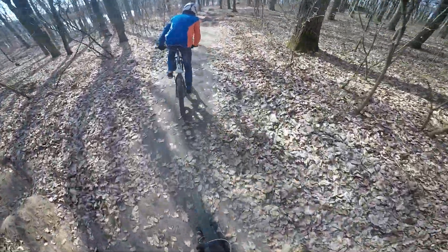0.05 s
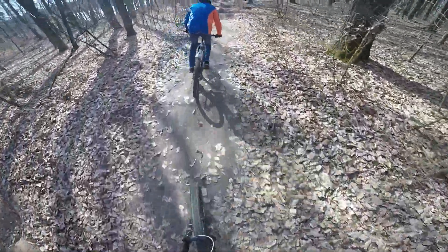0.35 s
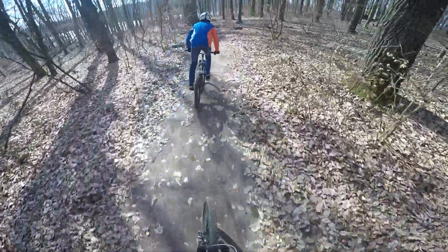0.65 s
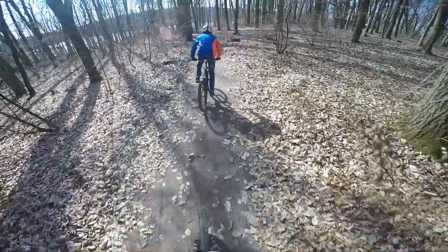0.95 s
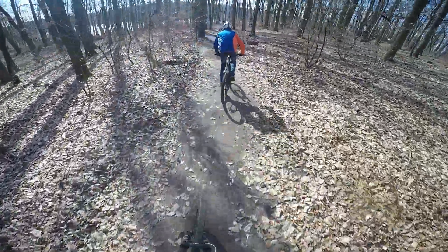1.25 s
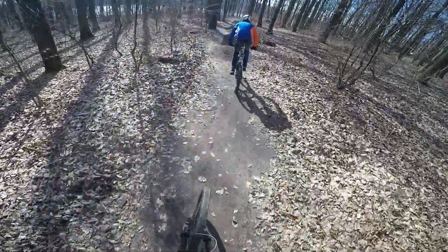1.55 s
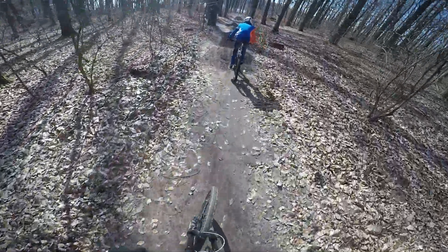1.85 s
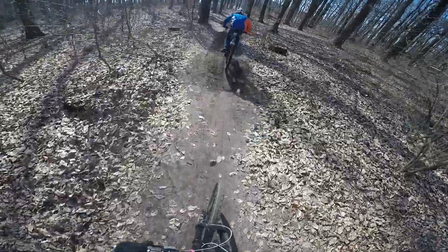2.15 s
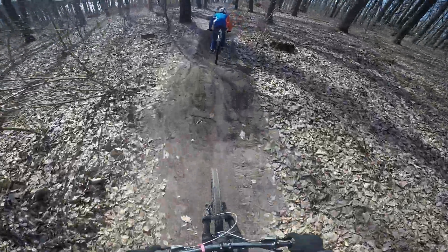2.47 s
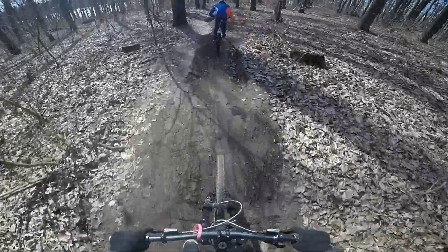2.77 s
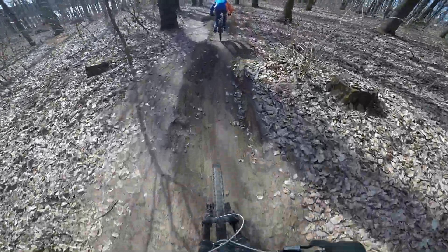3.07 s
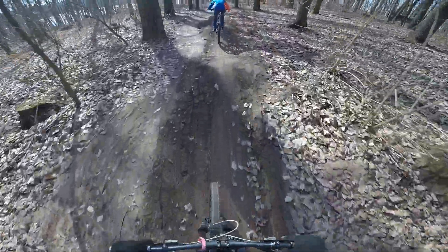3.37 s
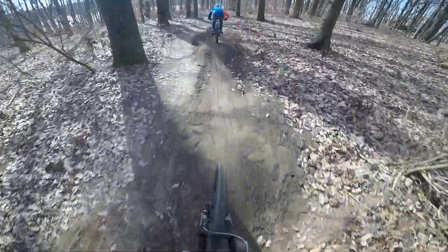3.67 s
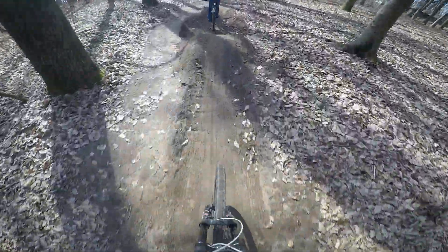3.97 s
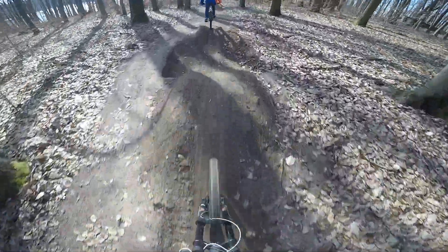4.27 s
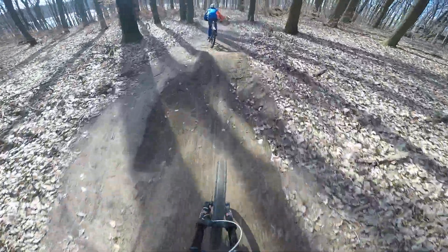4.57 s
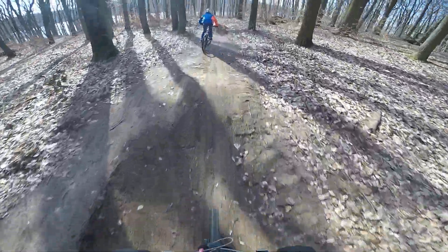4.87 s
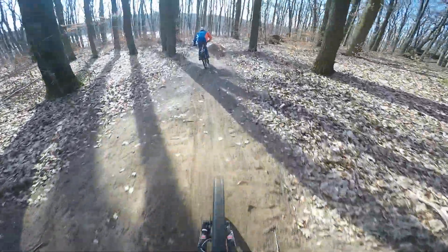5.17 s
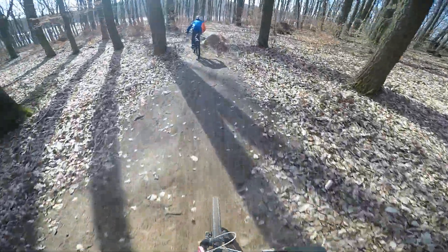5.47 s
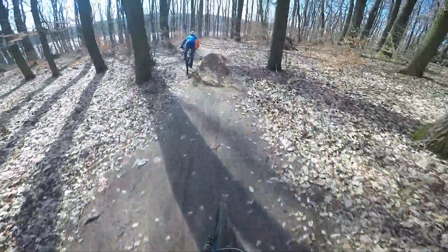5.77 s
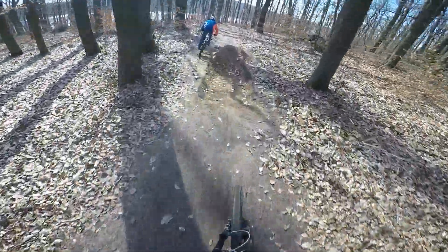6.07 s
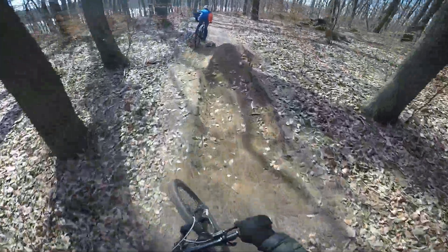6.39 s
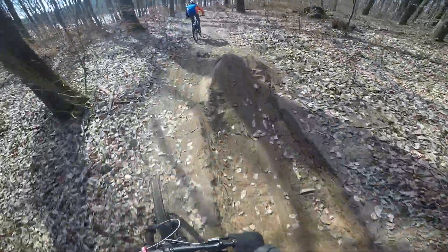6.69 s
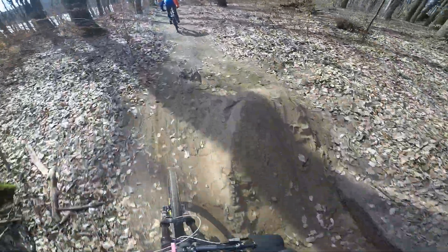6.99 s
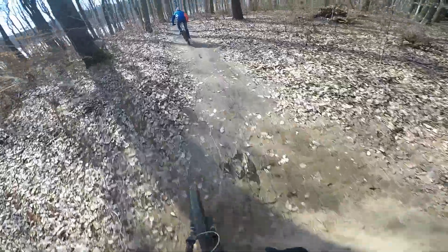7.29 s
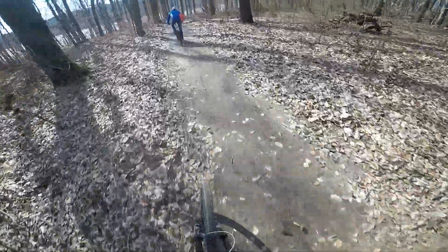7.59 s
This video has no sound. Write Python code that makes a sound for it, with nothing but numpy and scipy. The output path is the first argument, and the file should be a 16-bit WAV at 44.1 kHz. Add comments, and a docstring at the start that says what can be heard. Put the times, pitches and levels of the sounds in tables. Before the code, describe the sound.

A mountain bike coasts down a leafy dirt trail, heard close from a cased camera on the rider, with a slightly hollow, boxy tone. From the start, tyres crunch over soil and crackle through dry leaves, while the bike and camera mount give irregular sharp clacks, knocks and short scuffs, with occasional tiny twig snaps. Low wind buffets the microphone in gusts. From about 1.6 seconds the freewheel ticks in faint, thin, sizzling spurts, pausing around 5.6 and returning near 7.3. Stronger gusts arrive around 2.9, 4.3 and 5.2 seconds. Between 3.5 and 5.5 seconds, jolts make several deep, muffled thumps, the biggest at about 4.3, amid busier clattering. Firm knocks follow around 6 seconds, then the leaves crackle more and the rush of air swells as the bike gathers speed. The two hardest clacks land at about 7.5 and 7.6 seconds.

```python
"""A mountain bike coasts down a leafy dirt trail, heard from a cased camera worn by the rider.
From the start, tyres crunch over soil and dry leaves, and bike and mount clack and scuff on bumps.
After about 1.6 s the freewheel ticks in spurts. From 3.5 to 5.5 s, jolts thump the air in the case.
The rush of air grows as the bike gathers speed, and the two hardest clacks come just before the end.
The case rings at its own pitches, which colours most of these sounds."""
import sys
import numpy as np
from scipy import signal
from scipy.fft import rfft, irfft, next_fast_len
from scipy.io import wavfile
from scipy.ndimage import uniform_filter1d

SR = 44100
rng = np.random.default_rng(int(sys.argv[2]) if len(sys.argv) > 2 else 0)


def log_audio(samples):
    """Write samples as a 16-bit WAV file to the path given in sys.argv[1]."""
    # one column per channel
    frames = np.atleast_2d(samples).T
    # limit to full scale, then quantise
    limited = np.clip(frames, -1, 1)
    pcm = np.round(limited * 32767).astype(np.int16)
    wavfile.write(sys.argv[1], SR, pcm)


N = 336924
TIME = np.arange(N) / SR

# air stream, growing with speed: t/s, drone level/dB, rush level/dB
AIR_STREAM = [(0, -69.5, -68), (1.6, -58, -65), (2.2, -60.5, -66), (3.2, -58, -63.5), (4.1, -59, -63.5),
              (4.95, -53.5, -61), (5.5, -55, -63), (6.35, -54, -63), (6.6, -51.5, -56.5),
              (6.92, -51, -56.5), (7.2, -55.5, -58.5), (7.64, -52.5, -55.5)]
# puffs of pressure on bumps: t/s, peak level/dB, quickness/Hz, direction (+1 into the case, -1 out)
JOLTS = [(3.468, -20, 57, -1), (4.309, -13.5, 51.7, -1), (4.611, -19.5, 46.5, 1), (5.035, -25.5, 54.5, 1),
         (5.362, -20, 53, 1), (5.448, -28.5, 49, 1)]


def from_db(db):
    """Turn decibels into a number to multiply by."""
    return 10 ** (np.asarray(db) / 20)


def unit_power(x):
    """Scale a sound so that its average power is 1."""
    return x / np.sqrt(np.mean(x ** 2) + 1e-20)


def curves(rows):
    """Join timed points with straight lines, one curve for each column after the time."""
    times, *columns = np.transpose(rows)
    return [np.interp(TIME, times, column) for column in columns]


def add(out, s, sound):
    """Mix a short sound in at s seconds."""
    start = int(np.clip(s * SR, 0, N - 1))
    out[start:start + len(sound)] += sound[:N - start]


def drift(rate):
    """A smooth random wobble about 1 in size; a higher rate wobbles faster."""
    step, warm_up = 40, 2000
    pole = np.exp(-2 * np.pi * step * rate / SR)
    noise = rng.standard_normal(N // step + warm_up + 2)
    slow = signal.lfilter([1], [1, -2 * pole, pole * pole], noise)[warm_up:]
    return np.interp(np.arange(N) / step, np.arange(len(slow)), unit_power(slow))


def swell(s, length):
    """A smooth rise to 1 and fall, centred on s seconds."""
    out = np.zeros(N)
    start, end = np.searchsorted(TIME, [s - length / 2, s + length / 2])
    out[start:end] = np.cos(np.pi * (TIME[start:end] - s) / length) ** 2
    return out


def swells_db(rows):
    """Add a table of swells into one curve in dB."""
    return sum(db * swell(s, length) for s, length, db in rows)


def ring(x, hz, width_hz):
    """Make a sound ring at one pitch; a narrower width rings longer."""
    b, a = signal.iirpeak(hz, hz / width_hz, fs=SR)
    return signal.lfilter(b, a, signal.lfilter(b, a, x + 1e-18))


def through_case(x, colour):
    """Shape a sound by a colour (its level at each pitch) and the ringing case; the power comes out as 1."""
    # pitches the camera case boosts or weakens: f/Hz, width/Hz, gain/dB
    resonances = [(106, 56, 0.5), (227.4, 48, 7), (528, 16, 2.5), (678, 57, 4), (801, 19, 6.5),
                  (1130, 122, 7), (1342, 274, 9), (1830, 103, 5), (2027, 85, 6.5), (2080, 280, -0.5),
                  (2277, 104, 5.5), (2620, 44, -0.5), (2610, 230, 4.5), (3065, 280, -2), (3480, 156, 5),
                  (3900, 560, 5), (4400, 500, -3), (6650, 92, 1.5), (7870, 1340, 3)]
    size = 2 * next_fast_len(len(x) // 2 + 1)
    hz = np.maximum(np.arange(size // 2 + 1) * SR / size, 1)
    colour_hz, colour_db = np.transpose(colour)
    db = np.interp(np.log(hz), np.log(colour_hz), colour_db)
    db += sum(gain / (1 + (2 * (hz - centre) / width) ** 2) for centre, width, gain in resonances)
    # a minimum-phase filter: the case rings only after it is struck
    cepstrum = irfft(db * np.log(10) / 20)[:size // 2]
    response = np.exp(rfft(2 * cepstrum, size) - cepstrum[0])
    return unit_power(irfft(rfft(x, size) * response)[:len(x)])


def hiss():
    """A faint, steady hiss behind everything."""
    # colour of the hiss: f/Hz, level/dB
    colour = [(200, 8.9), (2000, 0.87), (6000, 5.7), (10000, 0.79), (15000, 0.46)]
    return from_db(-64) * through_case(rng.standard_normal(N), colour)


def buffeting():
    """How hard the air shakes the case: gusts on top of a wavering calm."""
    # gusts, strongest in dips of the trail: middle t/s, length/s, level/dB
    gusts = [(0.303, 0.52, -40), (0.627, 0.21, -34), (0.883, 0.12, -40), (1.228, 0.12, -40.5),
             (1.436, 0.065, -36), (1.746, 0.12, -38), (1.92, 0.24, -45.5), (2.56, 0.19, -53),
             (2.85, 0.24, -25), (3.003, 0.099, -29.5), (3.515, 0.18, -29), (3.647, 0.17, -29.5),
             (3.87, 0.36, -45), (4.308, 0.16, -22.5), (4.428, 0.14, -24.5), (5.07, 0.054, -31),
             (5.167, 0.075, -23.5), (5.248, 0.086, -29), (5.32, 0.07, -28.5), (5.805, 0.23, -29.5),
             (6.23, 0.13, -47), (6.915, 0.24, -32), (7.24, 0.5, -43), (7.54, 0.23, -34.5)]
    # lulls in the calm: middle t/s, length/s, gain/dB
    lulls = [(0.49, 0.1, -19), (1.3, 0.23, -15)]
    calm = from_db(-45 + 3 * drift(20) + swells_db(lulls))
    return calm + sum(from_db(db) * swell(s, length) for s, length, db in gusts)


def wind():
    """Swirls rock the air in the case; the stream drones and rushes past its edges, puffing at each jolt."""
    # colours of the deep swirls, the low drone and the higher rush: f/Hz, level/dB
    swirl_colour = [(8, -18.5), (16, 3), (24, 1), (34, -4.5), (50, -31.5), (80, -36.5), (150, -47),
                    (400, -66), (4000, -105)]
    drone_colour = [(40, -21.5), (80, 2.5), (130, 6), (180, -9), (280, -7.5), (400, -18), (900, -61)]
    rush_colour = [(150, -23.5), (330, -5.5), (480, 1), (680, -1.5), (880, 2), (1150, -5), (1500, -17),
                   (3000, -40)]
    drone_db, rush_db = curves(AIR_STREAM)
    swirls = signal.hilbert(through_case(rng.standard_normal(N), swirl_colour))
    # even them out: the swirls of one gust are much alike in strength
    swirl_power = uniform_filter1d(np.abs(swirls) ** 2, size=2000)
    swirls = unit_power(swirls.real / np.sqrt(swirl_power + 0.018))
    drone = from_db(drone_db - 0.04 + 1.57 * drift(21)) * through_case(rng.standard_normal(N), drone_colour)
    puffs = sum(from_db(db - 41) * swell(s, length=0.054) for s, db, _, _ in JOLTS)
    rush_gain = from_db(rush_db - 0.97 + 1.55 * drift(12.5)) + puffs
    rush = rush_gain * through_case(rng.standard_normal(N), rush_colour)
    return buffeting() * swirls + drone + rush


def thumps():
    """Each jolt rocks the air in the case once: a quick lead-in, the main swing, a slower settling."""
    out = np.zeros(N)
    for s, db, hz, direction in JOLTS:
        cycles = (TIME - s) * hz
        before_peak = cycles < 0
        spread = np.where(before_peak, 0.477, 0.77)
        turns = cycles * np.where(before_peak, 1.24, 0.575)
        out += direction * from_db(db) * np.cos(2 * np.pi * turns) * np.exp(-(cycles / spread) ** 2)
    return out


def freewheel():
    """Small catches (pawls) click and scrape over steel teeth in a thin sizzle; the hub whirrs along."""
    # spurts of ticking: start t/s, length/s, level/dB, pawl f/Hz, width/Hz (wider when they rattle)
    spurts = [(1.646, 0.33, -72.5, 14000, 750), (2.06, 0.2, -76, 14000, 900), (2.22, .06, -67, 13900, 1300),
              (2.28, 0.07, -64, 13850, 1700), (2.34, 0.13, -72, 13750, 1400),
              (2.553, 0.26, -71, 13950, 1100), (2.896, 2.03, -77, 13900, 700), (3.5, .24, -76, 13700, 1400),
              (4.27, .13, -71, 13900, 1100), (5.0, 0.6, -78, 14000, 900), (7.266, 0.45, -76.5, 14000, 800)]
    ticks_per_s, scrape_share, fade_s = 78, 0.21, 0.036
    rate = ticks_per_s * np.exp(0.13 * drift(1.6)) * from_db(0.84 * drift(11))
    tooth = np.cumsum(rate) / SR % 1  # runs from 0 to 1 across each tooth
    clicks = unit_power((np.diff(tooth, prepend=0) < 0) * from_db(3.4 * drift(30)))
    scrape = unit_power(np.exp(-tooth / scrape_share) * rng.standard_normal(N))
    force = clicks + scrape
    sizzle, running = np.zeros(N), np.zeros(N)
    for s, length, db, hz, width_hz in spurts:
        spurt = np.clip(np.minimum(TIME - s, s + length - TIME) / fade_s + 0.5, 0, 1)
        sizzle += from_db(db) * spurt * unit_power(ring(force * rng.choice([-1, 1], N), hz, width_hz))
        running = np.maximum(running, spurt)
    lower_ring = from_db(-78) * unit_power(ring(force * from_db(2 * drift(40)), hz=10070, width_hz=920))
    whirr = from_db(-66) * unit_power(ring(scrape, hz=2040, width_hz=180))
    return sizzle + running * (lower_ring + whirr)


def small_noises():
    """Short scuffs, squeaks, chain jingles and one low thud: bursts of rough noise that rise fast and fade."""
    # scuffs, squeaks, jingles and the thud: t/s, length/s, level/dB, centre f/Hz, width/octaves
    bursts = [(0.029, 0.042, -58, 2480, 1.5), (0.135, 0.054, -66.5, 2520, 0.023),
              (0.31, 0.064, -56, 2570, 1.2), (0.365, .045, -60, 2880, 0.91),
              (0.667, 0.032, -52.5, 2550, 1.1), (1.503, 0.15, -60.5, 950, 0.54),
              (1.759, 0.13, -60, 1050, 0.45), (2.201, 0.21, -62.5, 1470, 0.31),
              (3.013, 0.031, -58, 2630, 0.59), (3.242, 0.015, -53, 2300, 0.79),
              (3.366, 0.018, -53.5, 1630, 0.82), (3.715, 0.034, -50, 2730, 1.56),
              (3.712, 0.03, -70, 7450, 0.34), (3.759, 0.019, -50, 2530, 1.7),
              (4.147, 0.045, -53, 2250, 1.3), (4.294, 0.0089, -44, 2260, 0.12),
              (4.34, 0.032, -58.5, 7700, 0.59), (4.439, 0.061, -55.5, 1500, 1.2),
              (5.023, 0.042, -54.5, 1780, 1.6), (5.21, 0.052, -48.5, 1240, 1.7),
              (5.611, 0.026, -51, 2260, 0.67), (5.897, 0.03, -48, 2280, 1.2), (6.29, 0.047, -62, 5030, 0.1),
              (7.311, 0.034, -43, 125, 0.28)]
    roughness_db, edge_step_db = 4.5, -11.5
    out, t = np.zeros(N), TIME[:8192]
    for s, length, db, hz, octaves in bursts:
        progress = np.minimum(t / length, 1)
        shape = np.sqrt(np.maximum(np.sin(np.pi * progress ** 0.55), 0))
        flicker = unit_power(uniform_filter1d(rng.standard_normal(len(t)), size=110))
        rough_noise = rng.standard_normal(len(t)) * from_db(roughness_db * flicker)
        # flat across the width, falling steadily on either side
        colour = [(hz * 2 ** (k * octaves / 2), edge_step_db * (abs(k) - 1)) for k in (-6, -1, 1, 6)]
        add(out, s, from_db(db) * np.sqrt(length / t[-1]) * through_case(rough_noise * shape, colour))
    return out


def clacks():
    """A firm blow knocks the case and pings the struck part; a brief chatter gives the clack."""
    # hard contacts: t/s, level/dB, hardness (0 hollow knock, 0.5 clack, 1 ping), struck part f/Hz
    contacts = [(0.254, -57, 0.99, 3800), (0.325, -60, 0.93, 3600), (0.339, -51, 1, 3920),
                (0.572, -51, 0.84, 3870), (0.723, -49.5, 1, 4000), (1.032, -56.5, 0.97, 3670),
                (1.198, -52.5, 0.56, 3600), (1.383, -52.5, 0.83, 3660), (1.423, -48.5, 0.41, 3500),
                (1.511, -53, .25, 3500), (2.753, -52, 0.83, 4000), (2.83, -49, 0.87, 3900),
                (2.957, -55, 0.77, 3600), (3.022, -60, 0.81, 3520), (3.031, -51, 0.67, 3520),
                (3.259, -47, .74, 3850), (3.3845, -47.5, 0.89, 3720), (3.426, -53, 0.4, 3950),
                (3.482, -50, 0.69, 3680), (3.573, -52.5, 0.82, 3850), (3.624, -53, .95, 3850),
                (3.663, -52, .7, 3770), (3.714, -51.5, 0.86, 3750), (3.76, -50, 0.4, 3730),
                (4.301, -46, 0.72, 3500), (4.34, -46, 0.86, 3880), (4.406, -52, 0.24, 3500),
                (4.442, -49.5, 1, 3670), (4.565, -51, 0.42, 3500), (4.951, -53, 1, 3640),
                (4.959, -48.5, 0.93, 3670), (5.017, -49, 0.88, 3760), (5.185, -49.5, 1, 3700),
                (5.289, -49, 0.15, 3500), (5.535, -56, 0.73, 3650), (5.609, -57, 0.5, 3500),
                (5.631, -56.5, .75, 3860), (5.768, -47, 0.11, 3500), (5.8922, -43.5, 0.68, 3380),
                (5.909, -46, 0.79, 3600), (6.083, -43.5, 0.14, 3500), (6.196, -51, 0.52, 3700),
                (6.689, -52, 0.87, 3590), (7.209, -55.5, 0.8, 4000), (7.439, -53, .95, 3650),
                (7.467, -37, 0.73, 3540), (7.592, -38.3, 0.68, 3560), (7.611, -49.5, 0.6, 3700)]
    # colours of the hollow knock, the clack and its bright snap: f/Hz, level/dB
    knock_colour = [(300, -10), (600, -12), (820, 10), (1050, 14), (1350, 4), (2200, -12), (4000, -46)]
    clack_colour = [(700, -31), (1100, -20), (1400, -2), (1850, 4), (2400, -1.5), (2800, -1), (3150, -8),
                    (4300, -15), (6000, -42)]
    snap_colour = [(1500, -15), (3000, 7), (3700, 3), (4400, 2), (5200, 3), (5900, -16), (6500, 5),
                   (7200, -7), (8200, -7), (10000, -33), (15000, -47)]
    bite_s, contact_s, chatter_s = 0.0005, 0.0022, 0.007
    split = 0.045  # each part rings at two pitches, this share below and above its own
    out, t = np.zeros(N), TIME[:4096]
    # the parts take a moment to bite, then chatter as they settle
    settling = np.exp(-t / contact_s) + from_db(-22) * np.exp(-t / chatter_s)
    pressure = (1 - np.exp(-t / bite_s)) * settling
    impact = unit_power(signal.unit_impulse(len(t), int(bite_s * SR)))
    for s, db, hardness, ping_hz in contacts:
        # the hardness picks the blend of the three sounds
        knock_db, clack_db, ping_db = -37 * (hardness - np.array([0, 0.5, 1])) ** 2
        chatter = rng.choice([-1, 1], len(t)) * pressure
        blow = impact + 0.9 * unit_power(chatter)
        knock = from_db(knock_db - 9.5) * through_case(blow, knock_colour)
        clack = from_db(clack_db - 10.5) * through_case(chatter, clack_colour)
        snap = from_db(clack_db - 20) * through_case(chatter, snap_colour)
        # smaller, higher parts ring longer, and more strongly an octave up
        lightness = (ping_hz / 4000) ** 4
        width_hz = 280 / lightness
        pair = ring(blow, ping_hz * (1 - split), width_hz) - ring(blow, ping_hz * (1 + split), width_hz)
        octave = from_db(-15) * lightness ** 2 * unit_power(ring(blow, 2 * ping_hz, 2 * width_hz))
        ping = from_db(ping_db - 11) * (unit_power(pair) + octave)
        add(out, s, from_db(db) * (knock + clack + snap + ping))
    return out


def twig_snaps():
    """A twig or curled leaf breaks under a tyre: a first crack, then a dying run of more."""
    # snaps: t/s, fade time/s, level/dB, centre f/Hz
    snaps = [(0.324, 0.039, -68, 7600), (0.68, .012, -63, 7700), (2.107, 0.018, -65, 7000),
             (2.303, .01, -61, 5350), (3.476, 0.014, -59, 5300), (3.735, .012, -62, 6500),
             (3.81, .01, -63, 8050), (5.2, .015, -59, 5800), (5.956, .012, -61, 6000),
             (6.451, 0.045, -64.5, 6000), (6.642, .04, -63.5, 6500), (6.737, .01, -67, 5800),
             (6.854, .04, -64, 6200), (6.913, 0.013, -57, 5350)]
    cracks_per_s = 650
    out, t = np.zeros(N), TIME[:4096]
    for s, length, db, hz in snaps:
        breaks = rng.random(len(t)) < cracks_per_s / SR
        cracks = breaks * rng.standard_normal(len(t)) * np.exp(-t / length)
        cracks[0] = 1
        add(out, s, from_db(db) * np.sqrt(length / t[-1]) * unit_power(ring(cracks, hz, width_hz=4500)))
    return out


def grains(per_s, spread_db):
    """Tiny cracks at random times, a few much bigger than the rest."""
    breaks = rng.random(N) < per_s / SR
    return breaks * from_db(spread_db * np.minimum(rng.exponential(1, N), 4))


def tyre_levels():
    """Levels in dB of roll, crunch and leaf crackle, set by speed, weight on the tyres and the ground."""
    # dips and turns that press the tyres down (negative: a crest): middle t/s, length/s, load/dB
    dips = [(0.686, 0.22, 0.5), (1.15, 0.73, -2.5), (1.695, 0.95, 1.3), (2.573, 0.9, 1.9), (2.958, 0.61, 2),
            (3.124, 0.18, -3.5), (3.565, 0.98, 3.5), (4.382, 0.86, 4.5), (4.723, 0.18, -1),
            (5.186, 0.95, 4.5), (5.58, .12, -1), (5.936, 0.84, 2.5), (7.58, 0.88, 3)]
    # bare, packed soil that changes the roll: middle t/s, length/s, gain/dB
    bare_soil = [(1.6, 0.57, -16), (2.27, 0.81, 9), (5.22, 0.47, 4), (6.9, 0.62, 3), (7.5, 0.62, 2)]
    # patches of dry leaves: middle t/s, length/s, gain/dB
    leaf_patches = [(0.33, 0.23, 2), (2.15, 6.8, 2), (6.4, 0.92, 3.5), (6.85, 1, 3.5)]
    air_db, _ = curves(AIR_STREAM)
    speed_db = air_db - air_db.mean()
    # the tyres go light just after each dip
    rebound_db = 0.098 * sum(db * swell(s + 0.26, length=0.14) for s, _, db in dips)
    load_db = swells_db(dips) - rebound_db
    roll_db = -67 + 0.54 * speed_db + load_db + swells_db(bare_soil)
    crunch_db = -59.5 + 0.22 * speed_db + load_db
    leaf_db = -62.5 - 0.11 * speed_db + 0.83 * load_db + swells_db(leaf_patches)
    return roll_db, crunch_db, leaf_db


def tyres():
    """Tyre knobs break crumbs and leaves in clumps, and flick grit that rings briefly at its own pitch."""
    # colours of the roll on soil, the crunch of crumbs and the crackle of leaves: f/Hz, level/dB
    roll_colour = [(400, -35), (750, -17), (1050, -6.5), (1400, -7), (1800, -4), (4000, -73)]
    crunch_colour = [(700, -23.5), (1300, -3), (1650, 6.5), (2600, 1), (3300, -10), (5000, -43),
                     (12000, -27)]
    leaf_colour = [(1200, -30.5), (2600, 5), (3400, 3.5), (5000, 2), (8000, -8), (10000, -5), (15000, -10)]
    roll_db, crunch_db, leaf_db = tyre_levels()
    clumps = from_db(2 * drift(30))

    def ground(colour, spread_db, wash):
        """Nearby cracks over a smooth wash of distant ones."""
        cracks = unit_power(grains(per_s=3500, spread_db=spread_db) * clumps * rng.standard_normal(N))
        return through_case(cracks + wash * rng.standard_normal(N), colour)

    roll = from_db(roll_db - 2.5) * ground(roll_colour, spread_db=2, wash=0.6)
    crunch = from_db(crunch_db - 3.5) * ground(crunch_colour, spread_db=1, wash=0.78)
    leaves = from_db(leaf_db + 1.46 * drift(69)) * ground(leaf_colour, spread_db=3, wash=1)
    grit_hz, twig_hz = np.geomspace(1300, 4100, 12), np.geomspace(4800, 8300, 5)
    grit = sum(ring(grains(per_s=22, spread_db=5), hz, width_hz=1600) for hz in grit_hz)
    grit = from_db(crunch_db - 6.5) * through_case(grit * clumps, colour=[(1000, 9.5), (4100, 10)])
    twigs = sum(ring(grains(per_s=7.9, spread_db=1.5), hz, width_hz=500) for hz in twig_hz)
    return roll + crunch + leaves + grit + from_db(leaf_db - 16.5) * unit_power(twigs)


def scene():
    """Hiss, bike, ground and air, mixed into one channel."""
    mix = hiss() + freewheel() + clacks() + tyres() + twig_snaps() + small_noises() + wind() + thumps()
    return mix[None]


def record(dry):
    """Cut away the very highest treble steeply."""
    cutoff_hz = 15200
    return signal.sosfilt(signal.ellip(10, 0.1, 80, cutoff_hz, fs=SR, output="sos"), dry)


dry = scene()
out = record(dry)
log_audio(out)
```